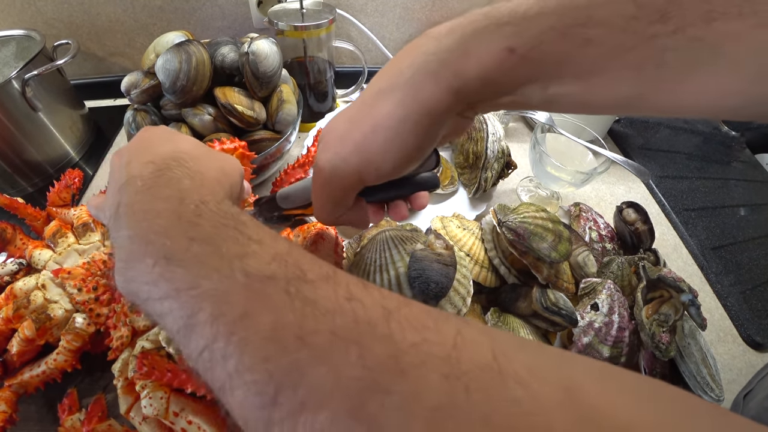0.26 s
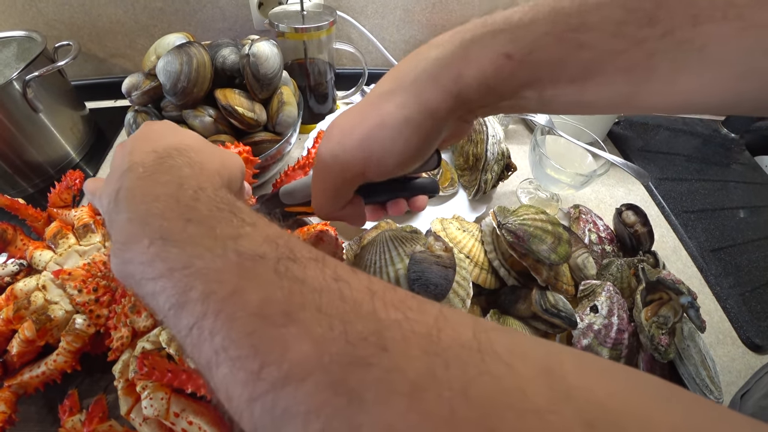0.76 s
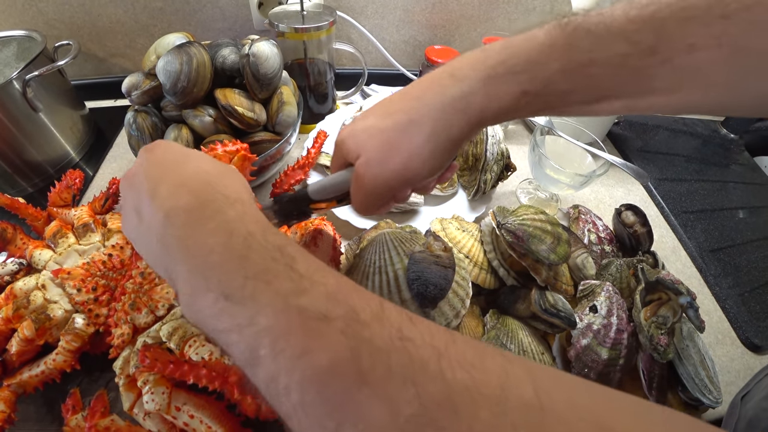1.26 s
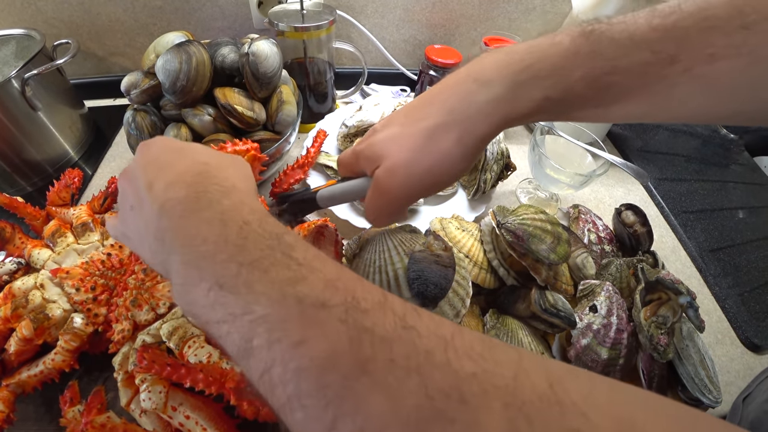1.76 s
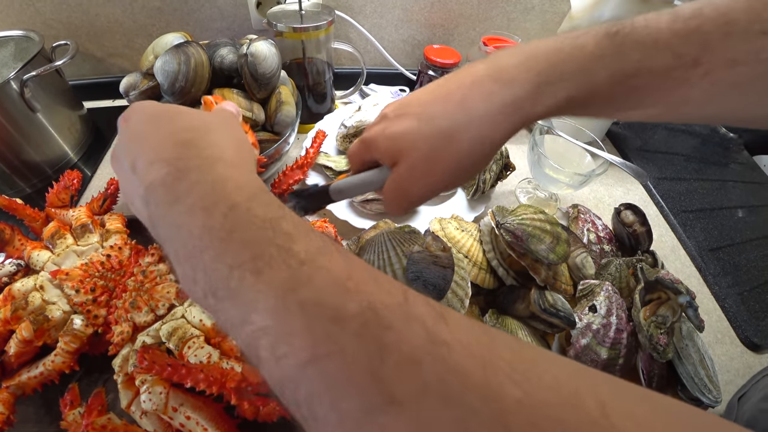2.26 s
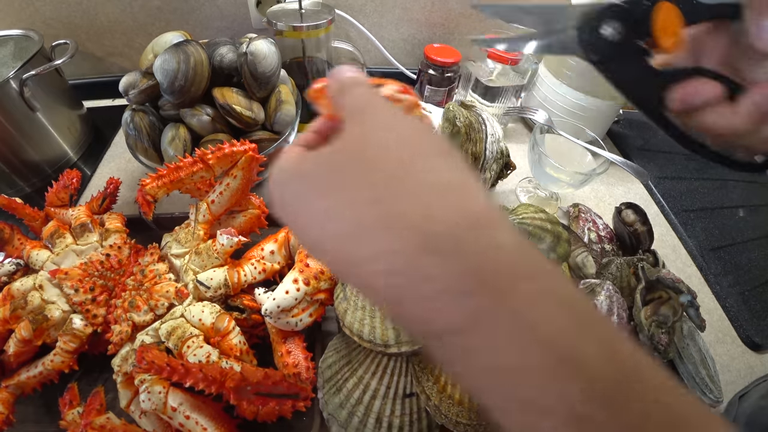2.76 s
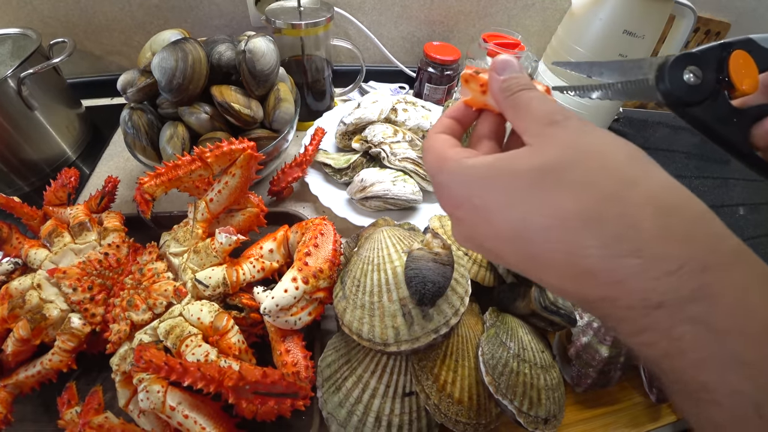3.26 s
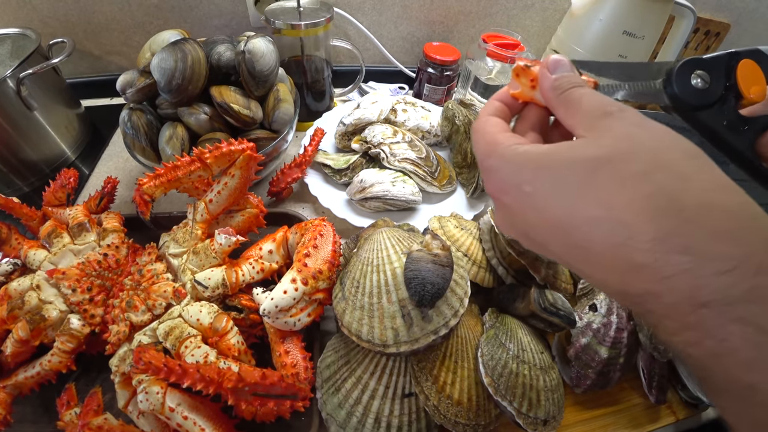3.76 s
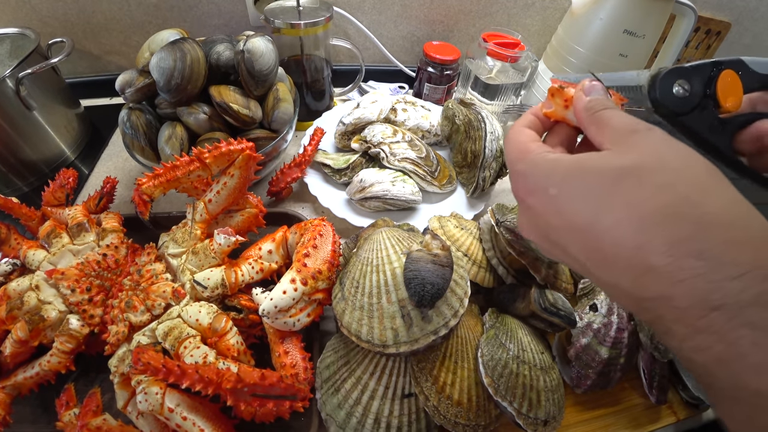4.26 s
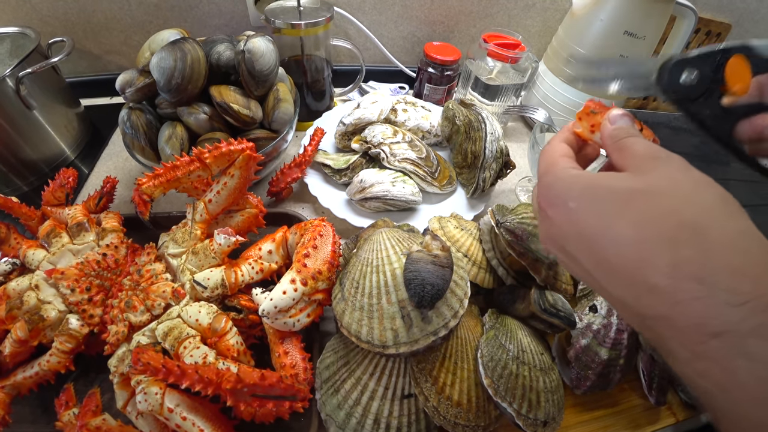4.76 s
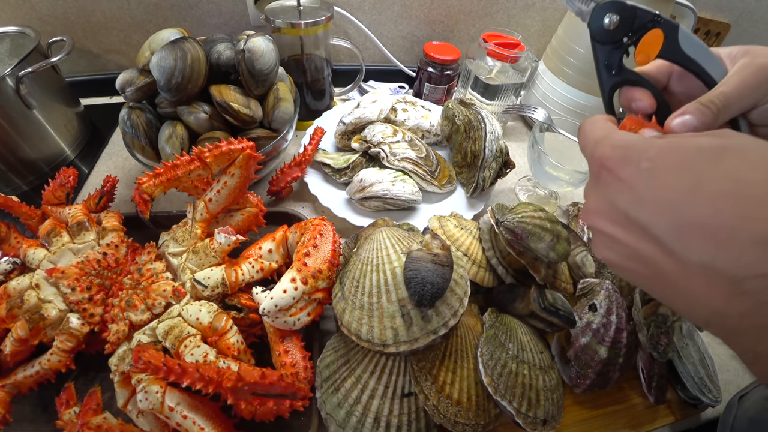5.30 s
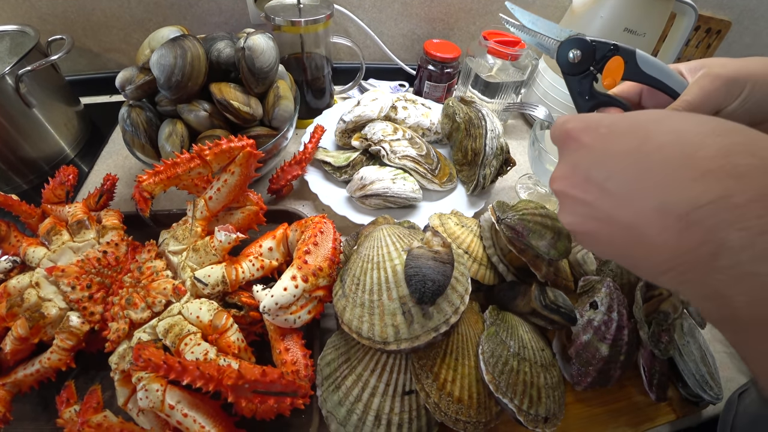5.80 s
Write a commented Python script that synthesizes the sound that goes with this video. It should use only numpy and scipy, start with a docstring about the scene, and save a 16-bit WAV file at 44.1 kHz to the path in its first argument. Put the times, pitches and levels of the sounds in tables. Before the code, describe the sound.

Close up in a small kitchen, shears cut a hard crab leg. The first crunchy cracks mix with dull knocks from shells on the table. A pause follows, then several crisp, ringing snips slightly to the right, with the steel scraping and squeaking briefly between bites. A few light metallic clicks finish it, over soft room noise and a faint low hum.

```python
"""A small kitchen, a stereo pair of microphones close over a table heaped with shellfish.
Shears cut a crab leg: first lying on the heap, which knocks and thuds, then a piece held in the air.
Each crack snaps, rings shell and blades near 3 kHz and shakes the leg; between bites the blades
scrape, squeak and click. Behind the hands are the room's short echo, soft noise and an appliance's hum."""
import sys
import numpy as np
from scipy import signal
from scipy.fft import rfft, irfft, next_fast_len
from scipy.io import wavfile
from scipy.ndimage import uniform_filter1d

SR = 44100
rng = np.random.default_rng(int(sys.argv[2]) if len(sys.argv) > 2 else 0)


def pcm_store(signal):
    """Save signal as 16-bit PCM."""
    levels = np.round(np.clip(np.atleast_2d(signal), -1, 1) * 32767)
    wavfile.write(sys.argv[1], SR, levels.astype(np.int16).T)


N = 266099
TIME = np.arange(N) / SR

# Single cracks of the shell, loud to faint, and a few small ticks from handling and the shears.
# Each row: start in seconds, snap and ring levels in dB.
CRACKS = [(.083, -45, -62), (0.408, -39, -56), (.52, -50, -52), (.84, -25, -59), (0.846, -22.5, -43),
          (0.8566, -20.5, -30), (0.8867, -19.5, -34), (0.9081, -15.5, -57), (.9572, -19, -37),
          (0.9838, -14, -21.5), (1.0125, -15, -17.5), (1.022, -19, -29), (1.074, -19.5, -36),
          (1.081, -37, -28), (1.1327, -22, -52), (1.1413, -25.5, -52), (1.1846, -24, -26.5),
          (1.2646, -20.5, -28.5), (1.2974, -38, -35), (1.4217, -43, -38), (1.4828, -38, -43),
          (1.5831, -41.5, -32), (1.7065, -58, -36), (1.9697, -33.5, -41), (1.981, -35, -34),
          (2.053, -19, -34), (2.0855, -23.5, -29), (2.1082, -23, -30), (2.8798, -55, -69),
          (3.9202, -30, -39), (3.9289, -20.5, -24.5), (3.9472, -18, -19), (3.9501, -19.5, -42),
          (3.9559, -25.5, -18.5), (3.9632, -21, -39), (3.99, -28, -27), (4.1315, -20.5, -24),
          (4.1693, -35.5, -31), (4.2117, -30, -53.5), (4.2174, -28.5, -53), (4.2316, -21.5, -29.5),
          (4.2424, -20, -29), (4.2513, -21.5, -15), (4.2735, -19.5, -24.5), (4.3249, -27.5, -37.5),
          (4.5022, -20.5, -22.5), (4.5334, -20, -26.5), (4.5368, -16, -29), (4.5438, -19, -12.5),
          (4.5764, -18.5, -30.5), (4.5799, -15.5, -21), (4.7352, -20.5, -26), (4.7699, -26, -26),
          (4.7908, -27, -27), (4.8022, -22.5, -12.5), (4.8075, -27.5, -18.5), (4.811, -30, -18.5),
          (4.8171, -25.5, -30), (5.3088, -59, -71)]
def cracking(trim_db=-0.25, detune=0.024):
    """Single cracks take the voice of the nearest bite; each fragment rings a little higher or lower."""
    out = np.zeros(N)
    for (start, snap_db, ring_db), chance in zip(CRACKS, rng.standard_normal(len(CRACKS))):
        nearest = min(BITES, key=lambda bite: abs(start - bite[0] - bite[1] / 2) - bite[1] / 4)
        *_, hz, body_db, low_hz, top_hz, tear_ms = nearest
        pitch = hz * (1 + detune * chance)
        crack = shell(fracture(tear_ms), 0.0043, snap_db, ring_db, pitch, body_db, low_hz, top_hz)
        add(out, start, undb(trim_db) * crack)
    return out


# Squeezes of the shears; thick, wet shell has more body and a duller snap. Each row: start and length
# in seconds, crumbling level in dB, ring against snap in dB, ring pitch in Hz, body against snap in dB,
# the snap's lower and upper edges in Hz, tearing time in ms.
BITES = [(0.836, 0.11, -32.5, -13, 2840, -16.5, 1320, 14000, 2.2),
         (0.944, .068, -28, -26, 2870, -18.5, 1320, 14000, 1.5),
         (1.006, 0.092, -30, -10, 2470, -4.5, 950, 9060, 4),
         (1.096, 0.089, -44, -4, 2820, -12, 1120, 12200, 3.9),
         (1.3, 0.8, -60.5, -8, 2890, 3, 1100, 12800, 3.5),
         (1.975, 0.081, -44, -9, 2400, -6.5, 1000, 12300, 7.2),
         (2.052, 0.074, -32.5, -6.5, 2860, -12, 1020, 12560, 4.7),
         (3.919, 0.084, -31.5, -5.5, 2695, -24, 2380, 14500, 2.1),
         (4.224, 0.093, -33, 3, 2750, -22.5, 2150, 15000, 2.5),
         (4.54, .064, -33, 0.5, 2934, -21, 1670, 11450, 0.4),
         (4.758, 0.04, -37.5, 0.5, 2820, -5.5, 1510, 6350, 1.6),
         (4.784, 0.038, -33.5, -3, 2990, -4, 1510, 6860, 1.17)]
def crumbling(grip_s=0.0051, let_go_s=0.016, give_db=2, firm_db=-30):
    """Shell crumbles into fine grains and sparser, higher splinters; a firmer bite makes more of both."""
    out = np.zeros(N)
    for start, length, db, ring_db, hz, *voice, _ in BITES:
        size = int(length * SR)
        giving_way = undb(np.linspace(0, -give_db, size))
        pressure = swell(size, grip_s, let_go_s) * giving_way * catching(size, depth_db=3.5)
        firmness = np.sqrt(undb(db - firm_db))
        fine, splinters = (2600, -1.5, hz), (260, -2.5, hz * 1.067)
        for per_s, share_db, pitch in fine, splinters:
            force = pressure * grains(size, per_s * firmness, spread_db=2.8)
            force = np.pad(force, (0, SR // 50))  # time to ring out
            snap_db = db + share_db
            add(out, start, shell(force, length, snap_db, snap_db + ring_db, pitch, *voice))
    return out


# Colours of the brittle snap and the leg's meaty body. Each row: frequency in Hz, gain in dB.
SNAP_COLOUR = [(300, -51), (900, -31.5), (1500, -19), (2400, -7.5), (3700, 0.5), (5400, 0.5), (7200, 0),
               (8600, -3.5), (10500, -3), (13000, -8), (16000, -10)]
BODY_COLOUR = [(60, -23.5), (170, -7.5), (290, -2), (420, -8), (720, 0.5), (950, -1.5), (1250, 1.5),
               (1900, 2), (2800, 3.5), (6000, -92)]
def shell(force, length_s, snap_db, ring_db, hz, body_db, low_hz, top_hz):
    """A force on the leg is heard as a bright snap, a short ring and a duller body."""
    snap = above(disperse(colour(force, SNAP_COLOUR)), low_hz)
    snap = signal.lfilter(*signal.cheby1(2, 1, top_hz, fs=SR), snap)
    parts = (snap, snap_db), (blades(force, hz), ring_db), (colour(force, BODY_COLOUR), snap_db + body_db)
    return sum(sized(x, db, length_s) for x, db in parts)


def fracture(tear_ms, first=1.4):
    """One sharp break, then a dying burst of smaller ones as the split runs on."""
    ms = np.arange(SR // 12) * 1000 / SR
    force = grains(len(ms), per_s=14000, spread_db=3.0) * np.exp(-ms / tear_ms)
    force[0] += first * np.sqrt(1 + tear_ms)
    return force


def disperse(x, bounce=0.6):
    """Bending waves run to and fro in the shell and smear each click over a millisecond."""
    for lag in rng.integers([2, 7], [6, 18]):  # two all-pass delays, in samples
        taps = np.r_[bounce, np.zeros(lag - 1), 1]
        x = signal.lfilter(taps, taps[::-1], x)
    return x


# The ring of shell and blades. Each row: multiple of the ring pitch, width in Hz, gain in dB.
RING_MODES = [(1, 410, 16), (.85, 360, -11), (1.14, 210, -29), (2.0, 500, -4)]
def blades(x, hz, split=0.036):
    """The two blades are pushed apart, in opposite phase; their close pitches make one broad ring."""
    return resonate(x, hz * (1 - split), RING_MODES) - resonate(x, hz * (1 + split), RING_MODES)


# The empty blades click together, and a few faint ticks come from handling. Each row: start in seconds, ring
# level in dB, ring pitch in Hz.
CLICKS = [(3.535, -55, 2600), (3.8573, -29, 2860), (5.3636, -53.5, 2780), (5.504, -43, 3320),
          (5.7315, -27, 2610), (5.734, -28, 2760), (5.8036, -37, 2860)]
def clicking(snap_db=-6, contact_ms=0.95):
    """Steel meets steel: mostly ring, with a little snap."""
    out = np.zeros(N)
    for start, db, hz in CLICKS:
        force = fracture(contact_ms)
        add(out, start, shell(force, 0.0035, db + snap_db, db, hz, body_db=-10, low_hz=1800, top_hz=9000))
    return out


# Bumps in the heap, just below the microphones. Each row: start in seconds, relative level in dB,
# pitch in Hz, rubbing time in ms, level of the table's thud in dB.
KNOCKS = [(0.073, -39.5, 905, 42, -41), (.095, -35, 1087, 10, -41.5), (0.115, -35, 1070, 33, -43),
          (.146, -38.5, 1220, 11, -34.5), (.160, -31, 1160, 4.9, -29.5), (.178, -37.5, 706, 27, -32.5),
          (.241, -39.5, 1010, 15, -41.5), (.409, -37.5, 1050, 16, -60), (.420, -37, 973, 16, -46),
          (.643, -39.5, 1123, 1.9, -42), (.72, -50.5, 1030, 23, -48.5), (1.0127, -23, 1580, 5.6, -28),
          (1.02, -35, 398, 5.8, -43), (1.03, -39, 845, 24, -29.5), (1.08, -32, 1160, 23, -32),
          (1.122, -36, 760, 12, -41), (1.484, -42, 1720, 4.1, -47), (1.564, -36, 1055, 5.1, -50),
          (1.596, -47, 890, 17, -40), (2.0544, -32, 466, 5.5, -32.5), (2.108, -34, 1780, 3.4, -46),
          (4.58, -35.5, 740, 13.6, -50), (4.803, -35, 895, 6.5, -53)]
# A bumped shell. Each row: multiple of its pitch, width in Hz, gain in dB.
CLACK_MODES = [(1, 200, 7), (.72, 35, -4), (1.85, 180, 3.5), (3.8, 640, -13), (6.5, 4400, -37)]
# The table's thud. Each row: frequency in Hz, gain in dB.
THUD_COLOUR = [(35, -29.5), (80, -9), (140, 3), (220, -1), (400, -8.5), (800, -1.5), (3000, -84)]
def heap(clack_db=3.0, tap_db=-4):
    """Shells knock and rub together, with a clack and a dull tap, and pass the blow on to the table."""
    out = np.zeros(N)
    for start, db, hz, rub_ms, thud_db in KNOCKS:
        force = fracture(rub_ms, first=2.67)
        clack = sized(resonate(force, hz, CLACK_MODES), db + clack_db, 0.007)
        tap = sized(colour(force, BODY_COLOUR), db + tap_db, 0.0069)
        thud = sized(colour(force, THUD_COLOUR), thud_db, 0.0086)
        add(out, start, clack + tap + thud)
    return out


# The blades slide over each other and along the shell.
# Each row: start and length in seconds, level in dB, ring pitch in Hz.
STROKES = [(1.375, 0.048, -43.5, 2060), (1.776, 0.13, -50.5, 2880), (2.279, 0.047, -43.5, 2080),
           (3.334, 0.04, -54, 2600), (3.575, 0.043, -54, 2660), (3.664, 0.24, -44, 2690),
           (4.086, 0.11, -50, 2520), (4.316, 0.063, -45, 3000), (4.391, 0.1, -40.5, 2800),
           (4.658, 0.15, -46, 2950), (5.525, 0.17, -67.5, 4100)]
# The sliding edge sings higher up. Each row: multiple of the ring pitch, width in Hz, gain in dB.
EDGE_MODES = [(2.63, 750, -11), (3.9, 700, -18), (5.1, 700, -23)]
def scraping(sing_db=-10, hiss_db=-9):
    """Little slips of the edge excite the ring and the edge's high modes while grit hisses."""
    out = np.zeros(N)
    for start, length, db, hz in STROKES:
        size = int(length * SR)
        slips = grains(size, per_s=3300, spread_db=1.0)
        ring = unit(blades(slips, hz)) + undb(sing_db) * unit(resonate(slips, hz, EDGE_MODES))
        grit = grains(size, per_s=14000, spread_db=4.5)
        hiss = unit(above(colour(grit, SNAP_COLOUR), hz))
        level = undb(db) * swell(size, attack_s=0.0092, release_s=0.021) * catching(size, depth_db=1.5)
        add(out, start, level * (ring + undb(hiss_db) * hiss))
    return out


def catching(size, depth_db):
    """Gain of a blade that catches and runs free by turns."""
    return unit(undb(depth_db * flutter(size, samples=300)))


# Squeaks at the cutting edge. Each row: start and length in seconds, level in dB,
# first and last pitch in Hz, octave against the fundamental in dB.
SQUEAKS = [(1.903, 0.024, -37.5, 2910, 2910, -30), (3.934, 0.048, -27.5, 2610, 2641, -2.5),
           (4.797, 0.019, -23.5, 3066, 2910, -5)]
def squeaks(waver=0.055, third_db=-15, rasp_db=-6):
    """Steel sticks and slips on wet shell: brief, unsteady tones with a rasp on each slip."""
    out = np.zeros(N)
    for start, length, db, hz, end_hz, octave_db in SQUEAKS:
        size = int(length * SR)
        pitch = np.linspace(hz, end_hz, size) * (1 + waver * flutter(size, samples=50))
        phase = 2 * np.pi * np.cumsum(pitch) / SR
        tone = np.sin(phase) + undb(octave_db) * np.sin(2 * phase) + undb(third_db) * np.sin(3 * phase)
        rasp = unit(colour(rng.standard_normal(size), SNAP_COLOUR)) * (1 + np.cos(phase)) / 2
        arch = np.sin(np.linspace(0, np.pi, size))
        add(out, start, undb(db) * unit((tone + undb(rasp_db) * rasp) * arch))
    return out


# The hands move from the heap into the air, across the pair.
# Each row: time in seconds, left minus right in dB.
HAND_PAN = [(0, 0.5), (2.3, 1.3), (4.3, -3.2), (5.8, -5.5)]
def close_pair(x, beam_db=-11, beam_hz=6500):
    """Direct sound follows the hands, while the fragments throw their treble to either side at random."""
    pan_db = np.interp(TIME, *np.transpose(HAND_PAN))
    beam = undb(beam_db) * above(x, beam_hz) * flutter(N, samples=200)
    return x * undb(np.array([pan_db, -pan_db]) / 2) + np.array([beam, -beam])


# The walls, heard from the table. Each row: frequency in Hz, seconds to fall 60 dB, level in dB.
WALL_ECHO = [(148.4, 0.85, -8.5), (600, 0.99, -12.5), (1490, 0.47, -13.5), (2990, 0.42, -12),
             (6250, 0.53, -17), (13300, 0.47, -19.5)]
def kitchen(x, table_db=-11, table_s=0.016, build_s=0.0029):
    """Scatter from the crowded table, then the short echo of the walls."""
    t = TIME[:SR * 2 // 3]
    hz, t60, db = np.transpose(WALL_ECHO)
    scatter = rng.standard_normal(len(t)) * np.exp(-t / table_s) * (t > .0007)
    response = sized(scatter, table_db, 1 / SR)
    edges = np.geomspace(60, 18000, 10)
    for lo, hi in zip(edges, edges[1:]):
        bandpass = signal.butter(3, [lo, hi], "band", fs=SR, output="sos")
        band = signal.sosfilt(bandpass, rng.standard_normal(len(t)))
        decay, level = (np.interp(np.log(lo * hi) / 2, np.log(hz), column) for column in (t60, db))
        tail = band * np.exp(-np.log(1000) * t / decay) * (1 - np.exp(-(t / build_s) ** 2))
        response += sized(tail, level, 2 * (hi - lo) / SR ** 2)
    return signal.fftconvolve(x, response)[:N]


# Room tone. Each row: frequency in Hz, relative density in dB.
AIR_COLOUR = [(15, -19), (25, -4.5), (76, -6.5), (130, -4.5), (157, -12.5), (195, -3.5), (223, -20),
              (263, -6), (531, -19), (818, -19.5), (2220, -24.5), (2760, -24.5), (3080, -25.5),
              (10100, -32.5), (16000, -32.5)]
def room_tone(db=-56.53, side_db=-3):
    """Soft, steady noise reaches the microphones from all around."""
    mid, side = (unit(colour(rng.standard_normal(N), AIR_COLOUR)) for _ in range(2))
    return undb(db) * diffuse(mid, undb(side_db) * side)


# An appliance in the background. Each row: frequency in Hz, relative level in dB.
HUM_TONES = [(48.4, -67), (129.2, -66.5), (188.4, -73.5), (263.8, -63)]
def appliance(trim_db=-2):
    """A hum of low tones, each wavering slightly in phase."""
    knots = np.linspace(0, TIME[-1], 30)
    hum = np.zeros(N)
    for hz, db in HUM_TONES:
        drift = np.interp(TIME, knots, rng.standard_normal(len(knots)))
        hum += undb(db + trim_db) * unit(np.sin(2 * np.pi * hz * TIME + drift))
    return hum


# Diffuse sound at two closely spaced microphones. Each row: frequency in Hz, side against mid in dB.
PAIR_WIDTH = [(60, -10.5), (150, -10), (300, -0.5), (700, 6.5), (1500, 6), (3000, .5), (9000, -1.5)]
def diffuse(mid, side):
    """Sound from all around: alike on both sides in the bass, unrelated in the treble."""
    side = colour(side, PAIR_WIDTH)
    return np.array([mid + side, mid - side])


def grains(size, per_s, spread_db):
    """Tiny random slips and fractures: many weak, a few strong."""
    present = rng.random(size) < per_s / SR
    sign = rng.choice([-1, 1], size)
    strength = undb(spread_db * np.minimum(rng.exponential(size=size), 4))
    return unit(present * sign * strength)


def resonate(x, hz, modes):
    """Damped modes at multiples of a pitch; a small object radiates little below the lowest."""
    x = above(x, 0.78 * hz * min(k for k, _, _ in modes))
    out = np.zeros(len(x))
    for k, width, db in modes:
        peak = signal.iirpeak(min(k * hz, SR / 2 - 1000), k * hz / width, SR)
        out += undb(db) * signal.lfilter(*peak, x)
    return out


def colour(x, points):
    """Minimum-phase filter with a response of (Hz, dB) points."""
    size = next_fast_len(len(x) + 2048)
    hz, db = np.transpose(points)
    bin_hz = np.arange(size // 2 + 1) * SR / size
    log_gain = np.interp(np.log(bin_hz + 1), np.log(hz), np.log(undb(db)))
    cepstrum = irfft(log_gain, size)
    cepstrum[1:size // 2] *= 2
    cepstrum[size // 2 + 1:] = 0
    return irfft(rfft(x, size) * np.exp(rfft(cepstrum)), size)[:len(x)]


def above(x, hz):
    """Steep high-pass."""
    return signal.sosfilt(signal.butter(4, hz, "high", fs=SR, output="sos"), x)


def flutter(size, samples):
    """Noise smoothed over some samples, at rms 1."""
    return unit(uniform_filter1d(rng.standard_normal(size), size=samples))


def swell(size, attack_s, release_s):
    """Attack, hold and release."""
    t = np.arange(size) / SR
    return np.clip(np.minimum(t / attack_s, (t[-1] - t) / release_s), 0, 1)


def sized(x, db, length_s):
    """Give a sound the energy of a level held for some time."""
    return unit(x) * undb(db) * np.sqrt(length_s * SR / len(x))


def undb(db):
    """Decibels to gain."""
    return 10 ** (np.asarray(db) / 20)


def unit(x):
    """Scale to rms 1."""
    return x / np.sqrt(np.mean(x ** 2) + 1e-20)


def add(track, start_s, x):
    """Mix a sound in at its start time."""
    i = int(start_s * SR)
    track[i:i + len(x)] += x[:N - i]


def scene(work_db=-0.5):
    """The hands work close to the microphones, with the kitchen around them."""
    work = undb(work_db) * (cracking() + crumbling() + clicking() + heap() + scraping() + squeaks())
    return close_pair(work) + diffuse(kitchen(work), kitchen(work)) + room_tone() + appliance()


def record(dry, top_hz=16000):
    """The recorder rounds the highest peaks and cuts the top."""
    return signal.sosfilt(signal.ellip(8, .2, 70, top_hz, fs=SR, output="sos"), np.tanh(dry))


dry = scene()
out = record(dry)
pcm_store(out)
```